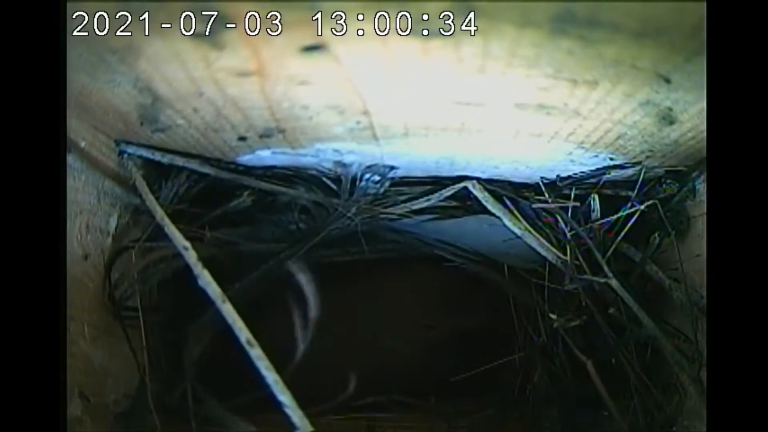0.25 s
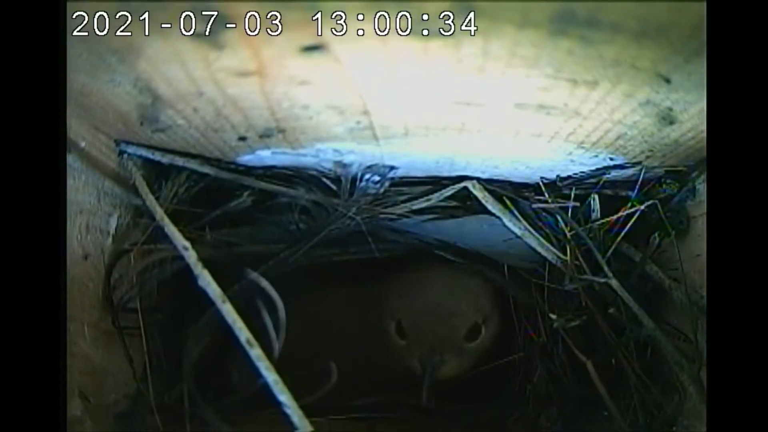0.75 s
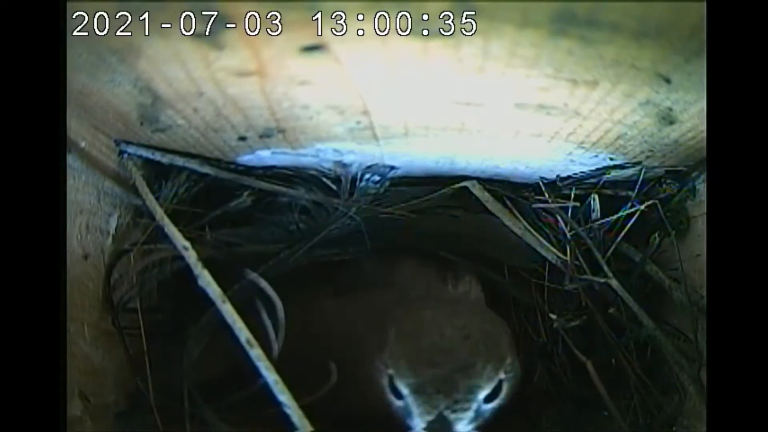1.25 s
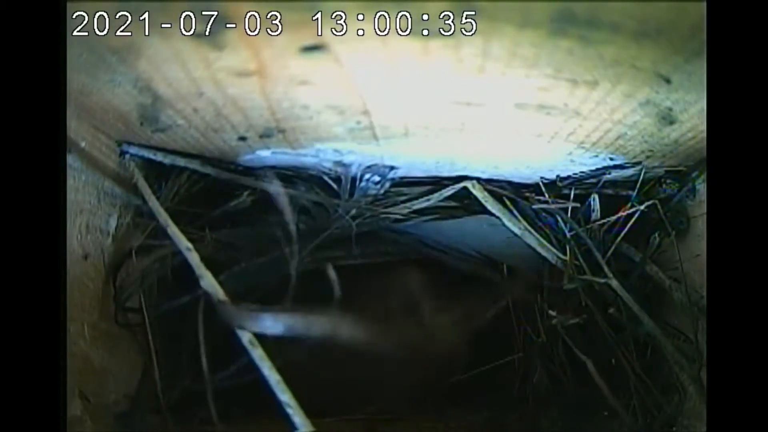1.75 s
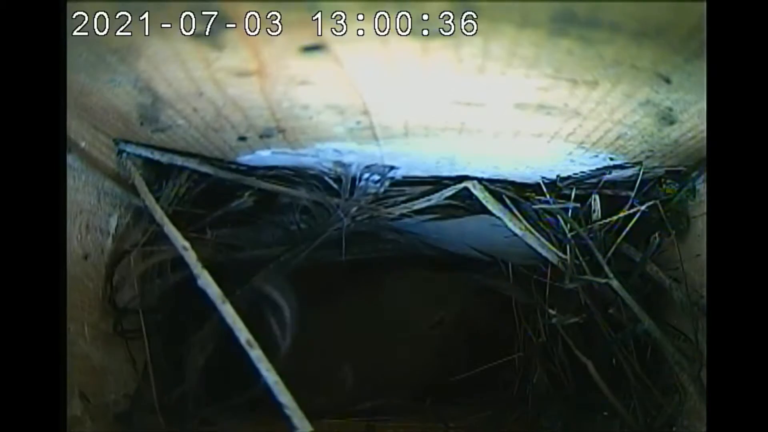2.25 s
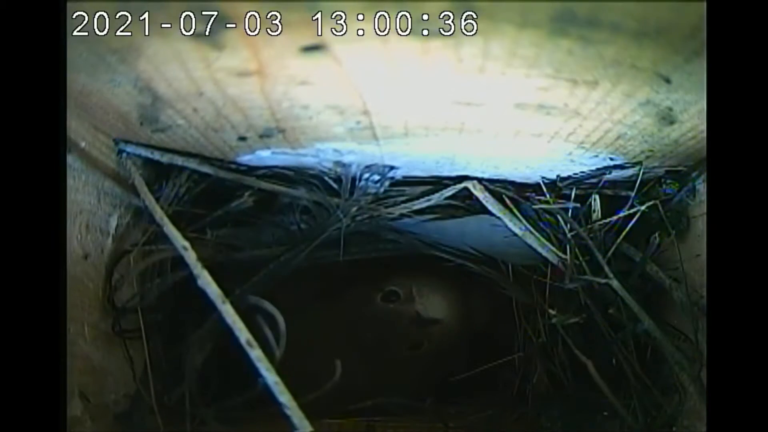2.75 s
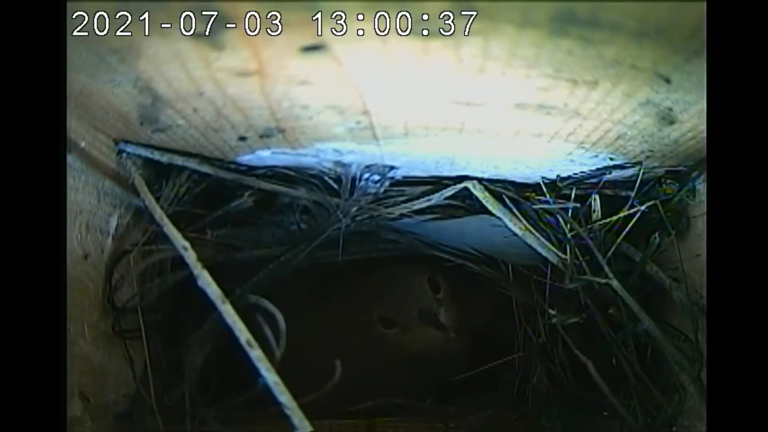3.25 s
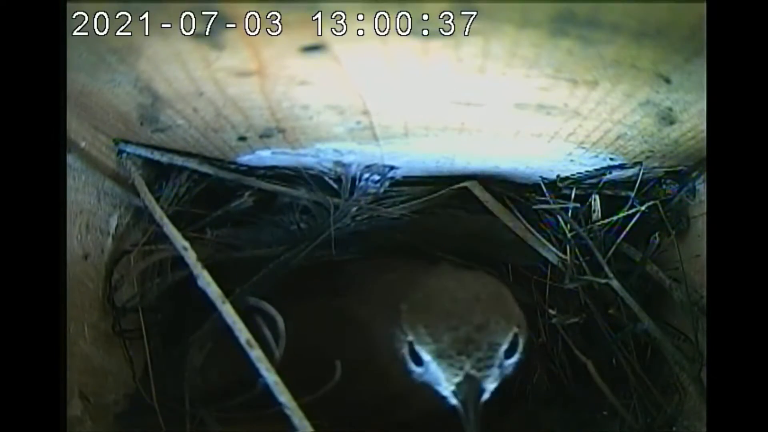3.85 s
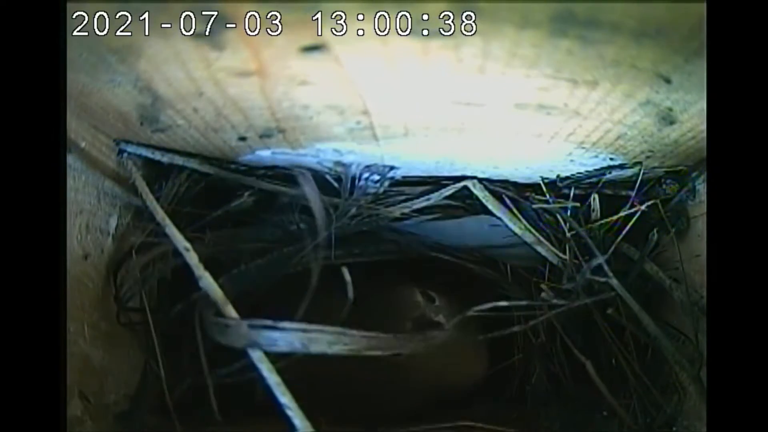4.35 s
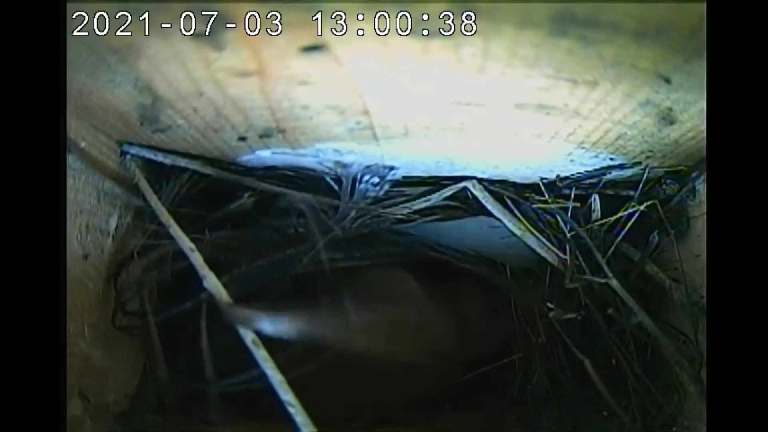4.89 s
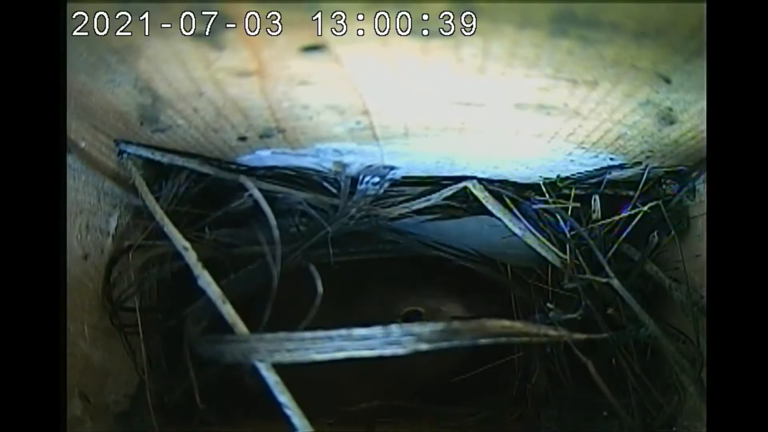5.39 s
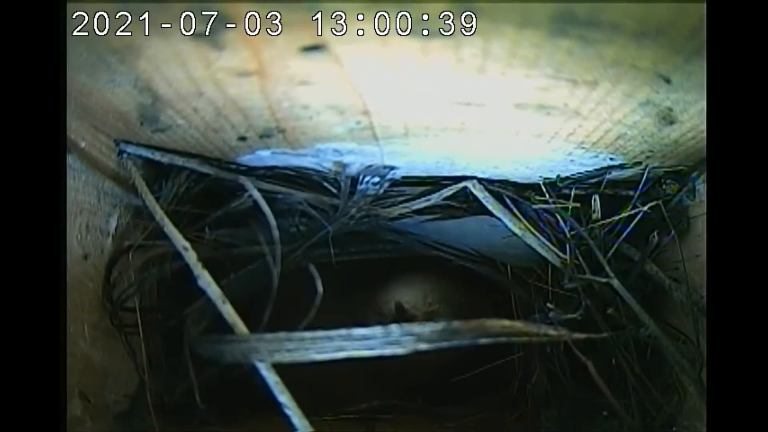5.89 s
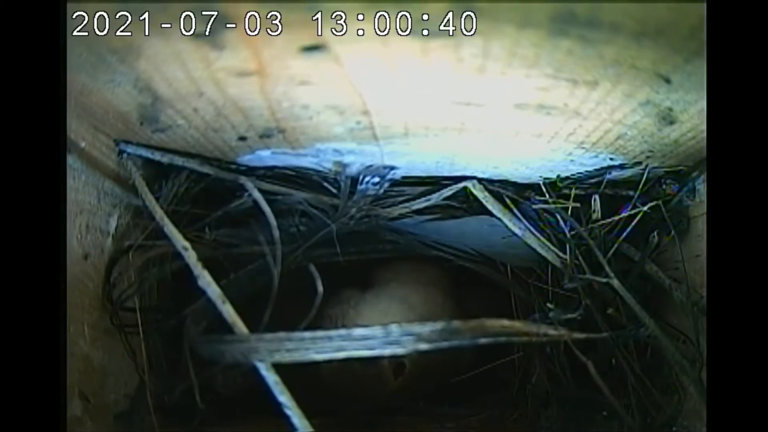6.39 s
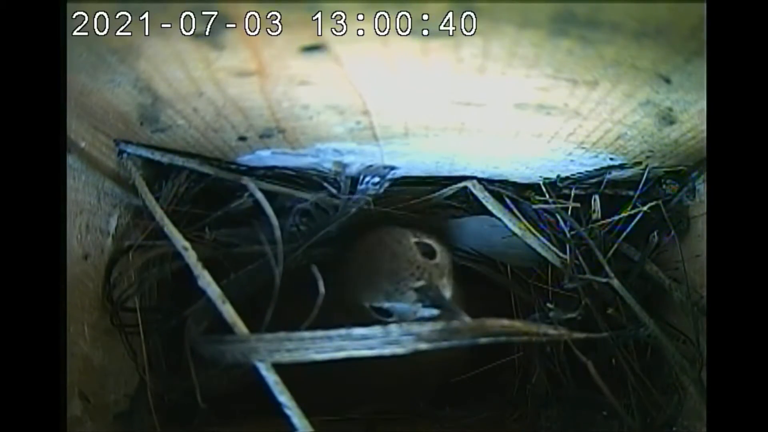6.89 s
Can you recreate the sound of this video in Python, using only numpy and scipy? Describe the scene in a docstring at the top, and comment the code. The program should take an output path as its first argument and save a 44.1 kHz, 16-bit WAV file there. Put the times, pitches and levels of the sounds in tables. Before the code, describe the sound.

A cheap small microphone in a nest box, heard mostly in the left channel, picks up low electrical hum, rumble, hiss and a thin video whine. Dry stalks rustle and wood is lightly scraped and knocked. Midway a wren sings: rough broken notes, swinging clear whistles, a rapid descending-note trill and a final flourish, ringing briefly in the box with a faint garden echo. Then it is nearly quiet.

```python
"""A wren sings at a wooden nest box, heard by a small camera inside: scratchy opening notes, then whistled trills.
Each syllable is a gliding tone with overtones and half-pitch tones, ringing in the box and echoing in the garden.
A second wren shuffles in the dry nest: shaped noise for straw and wood scrapes. Short dry clicks of bright noise
with a low knock are scattered about, some of them on top of the song. Under it lie mains hum from one repeated
cycle, a thin video whistle with fizz, low rumble and hiss; the right channel is a weak leak with its own hiss."""
import sys
import numpy as np
from scipy import signal
from scipy.fft import rfft, irfft, next_fast_len
from scipy.io import wavfile
from scipy.ndimage import map_coordinates

SR = 44100
rng = np.random.default_rng(int(sys.argv[2]) if len(sys.argv) > 2 else 0)


def transcribe(signal):
    """Save signal, clipped to [-1, 1], as a 16-bit WAV file at the path in sys.argv[1]."""
    frames = np.atleast_2d(signal).T
    limited = np.clip(frames, -1, 1)
    pcm = np.round(limited * 32767).astype(np.int16)
    wavfile.write(sys.argv[1], SR, pcm)


N = 314433
TIME = np.arange(N) / SR
MAINS_HZ = 59.89  # also the picture field rate


def amp(db):
    """Decibels to gain."""
    return 10 ** (np.asarray(db) / 20)


def unit(x):
    """Scale x to rms 1."""
    return x / np.sqrt(np.mean(x ** 2) + 1e-20)


def along(points, hz):
    """Read an outline of (f/Hz, level/dB) points on a log frequency axis."""
    f, v = np.transpose(points)
    return np.interp(np.log(hz + 1), np.log(f + 1), v)


def wobble(rate, size):
    """A smooth random curve with rate knots a second."""
    knots = rng.standard_normal(size // 4 + 8)
    return map_coordinates(knots, [np.arange(size) * rate / SR], mode="wrap")


def filtered(x, response):
    """Multiply the spectrum of x by a response of frequency."""
    m = next_fast_len(N + 8192)
    return irfft(rfft(x, m) * response(np.fft.rfftfreq(m, 1 / SR)), m)[..., :N]


def coloured(x, points, size=2048):
    """Pass x through a causal minimum-phase filter with the given outline."""
    log_gain = np.log(amp(along(points, np.fft.rfftfreq(size, 1 / SR))))
    cepstrum = irfft(log_gain)
    # folding the cepstrum forward in time makes the filter causal
    cepstrum[1:size // 2] *= 2
    cepstrum[size // 2 + 1:] = 0
    impulse = irfft(np.exp(rfft(cepstrum)))
    return signal.oaconvolve(x, impulse)[:N]


def modes(table, hz):
    """Summed response of resonances given by centre, width and level."""
    return sum(amp(db) * 1j * hz * w / (c * c - hz * hz + 1j * hz * w) for c, w, db in table)


def add(track, s, sound):
    """Mix a sound into the track at s seconds, cut at the track's end."""
    part = track[round(s * SR):][:len(sound)]
    part += sound[:len(part)]


# low modes of the wooden box: f/Hz, width/Hz, level/dB
WOOD_MODES = [(244, 44, -2.5), (323, 79, 0.5), (422, 54, -1.5), (530.5, 36.7, 3), (655, 175, -14)]


def wood(hz):
    """Response of the box's low modes; neighbours move in opposite senses."""
    return sum((-1) ** k * modes([mode], hz) for k, mode in enumerate(WOOD_MODES))


# shuffles in the nest: t/s, length/s, wood scrape level/dB, straw level/dB (both relative)
SHUFFLE_MOVES = [ (0, .16, -48, -59), (0.196, 0.066, -44.5, -57.5), (0.68, 0.018, -59, -69),
                 (1.548, 0.051, -48.5, -55), (1.62, 0.061, -47.5, -63.5), (1.726, 0.084, -45.5, -57.5),
                 (1.848, .15, -49, -57.5), (2.019, .13, -48, -59), (2.17, 0.045, -63, -63.5),
                 (2.261, .04, -45, -56), (2.357, .035, -47, -52), (2.486, 0.029, -46, -63.5),
                 (4.23, .02, -44.5, -58.5), (4.307, 0.051, -43.5, -57), (4.373, .025, -53.5, -60.5),
                 (4.48, .11, -46, -60.5), (4.62, 0.058, -58, -64), (4.712, .085, -45.5, -57),
                 (4.828, 0.038, -48, -55.5), (4.923, .115, -46.5, -57), (5.05, 0.16, -53.5, -60.5),
                 (5.241, .04, -47, -54), (5.388, 0.037, -60, -73), (5.663, .02, -49.5, -71),
                 (6.785, 0.023, -53.5, -74), ]
# tone colour of slipping straw: f/Hz, relative level/dB
STRAW_COLOUR = [(530, -58), (900, -26.5), (1420, -5.5), (1680, -10.5), (1920, 0.5), (2780, -15),
                (3040, -13), (3930, -15.5), (4550, -7), (5030, -23.5), (5560, -22.5), (6430, -21),
                (7520, -30), (10100, -26), (13000, -30)]
SHUFFLE_ATTACK_S, SHUFFLE_T60_S = 0.011, 0.14  # a shuffle starts quickly, then the stalks settle


def shuffling(straw_db=7, scrape_db=-2, grain_rate=2200, uneven_db=1.2, surge_db=1.5):
    """Dry stalks slip in clumps of tiny ticks, while the bird's body rubs the wooden walls."""
    scrape, straw = np.zeros((2, N))
    t = np.arange(SR // 2) / SR
    for s, length, wood_db, stalk_db in SHUFFLE_MOVES:
        settling = amp(-60 * np.maximum(t - length, 0) / SHUFFLE_T60_S)
        push = np.minimum(t / SHUFFLE_ATTACK_S, 1) * settling
        add(scrape, s, amp(wood_db) * push)
        add(straw, s, amp(stalk_db) * push)
    clumps = amp(2.74 * wobble(130, N) + surge_db * wobble(35, N))
    # sparse random ticks, on average grain_rate a second
    slips = (rng.random(N) < grain_rate / SR) * rng.standard_normal(N) * clumps
    rough_noise = rng.standard_normal(N) * amp(uneven_db * wobble(60, N))
    rubbing = unit(filtered(rough_noise, wood))
    rustle = unit(coloured(slips, STRAW_COLOUR))
    return amp(straw_db) * straw * rustle + amp(scrape_db) * scrape * rubbing


# outline of the mains harmonics: f/Hz, relative level/dB
HUM_OUTLINE = [(60, -56.5), (120, -56.5), (180, -62.5), (240, -73.5), (300, -63.5), (420, -79),
               (720, -85.5), (1260, -85.5), (2400, -90), (4000, -104), (12500, -106), (15000, -100)]


def mains(scatter_db=3, size=8192, count=251):
    """One cycle of electrical buzz repeats at the mains rate; its harmonics above 400 Hz are uneven."""
    hz = MAINS_HZ * np.arange(1, count + 1)
    unevenness_db = scatter_db * (hz > 400) * rng.standard_normal(count)
    levels = amp(along(HUM_OUTLINE, hz) + unevenness_db)
    harmonics = levels * np.exp(2j * np.pi * rng.random(count))
    cycle = irfft(np.append(0, harmonics), size) * size / np.sqrt(2)
    return np.interp(TIME * MAINS_HZ % 1 * size, np.arange(size), cycle)


# bursts of fizz in each picture field: position/share of the field, relative level/dB
FIELD_BURSTS = [(.52, 0.5), (.82, 0)]
# tone colour of the fizz: f/Hz, relative level/dB
FIZZ_COLOUR = [(9500, -30), (11200, -10), (12500, -13), (13900, -1.5), (14800, -5.5), (15700, 0),
               (16200, -41)]
WHISTLE_HZ = 15718


def video_whistle(whistle_db=-58, half_rate_db=-87, fizz_db=-74.0, spike_db=-62, spike_width=.03, field_peak=.7):
    """The line scan leaks in as a thin whistle and fizz, chopped by every picture field."""
    cycle = MAINS_HZ * TIME % 1
    field = np.clip(1 / 2 + .9 * np.cos(2 * np.pi * (cycle - field_peak)), .2, 1)
    phase = 2 * np.pi * WHISTLE_HZ * TIME + .12 * wobble(300, N)
    flicker = amp(.6 * wobble(70, N))
    whistle = amp(whistle_db) * flicker * np.sqrt(2) * np.sin(phase)
    half_rate = amp(half_rate_db) * np.sqrt(2) * np.sin(phase / 2)
    spikes = sum(amp(spike_db + db) * np.exp(-((cycle - at) / spike_width) ** 2) for at, db in FIELD_BURSTS)
    fizz = unit(coloured(rng.standard_normal(N), FIZZ_COLOUR))
    return field * (whistle + amp(fizz_db) * fizz) + spikes * fizz + half_rate


# outline of the steady noise: f/Hz, relative level/dB in each Hz
NOISE_FLOOR = [(15, -86), (40, -83), (150, -77), (290, -78.5), (400, -88.5), (560, -86), (700, -94),
               (1050, -102.3), (1650, -101.2), (2150, -97.5), (3600, -108), (4550, -104), (5200, -111),
               (8000, -110.5), (9700, -113), (12000, -112.5), (16000, -112)]


def background(drift_db=1.57):
    """Low outdoor rumble in the box, drifting in level, and the microphone's hiss."""
    noise = filtered(rng.standard_normal(N), lambda hz: amp(along(NOISE_FLOOR, hz))) * np.sqrt(SR / 2)
    rumble = filtered(noise, lambda hz: 1 / (1 + (hz / 3000) ** 2))
    drift = amp(drift_db * wobble(12, N))
    return noise + rumble * (drift - 1)


# short dry clicks, some of them on top of the song:
# t/s, bright noise level/dB, middle noise level/dB, low knock level/dB (all relative)
CLICK_HITS = [(0.2095, -52, -52, -36), (0.261, -44.5, -49.5, -47), (1.5407, -54, -50, -34.5),
              (1.782, -47.5, -45.5, -49), (1.9684, -54.5, -45, -29), (2.2913, -57, -55, -41),
              (2.365, -39.5, -27.5, -27), (2.3774, -39, -48, -46), (3.678, -46.5, -45, -50),
              (3.8016, -39, -37, -48), (4.2363, -43, -39, -41), (4.4854, -42.5, -39, -32),
              (4.4937, -41, -38, -58), (4.724, -37.5, -37, -39)]
# tone colour of the bright noise: f/Hz, relative level/dB
BRIGHT_COLOUR = [(2000, -20), (6000, -8), (11000, 6), (15000, -3)]
# tone colour of the middle noise: f/Hz, relative level/dB
MIDDLE_COLOUR = [(900, -38), (1400, -13.5), (2400, -24.5), (3100, 7), (4500, 4.5), (5300, -7.5),
                 (7200, -9.5), (15000, -54)]


def clicks(bright_gain_db=-3, middle_gain_db=7, knock_gain_db=11, tail_db=-18, knock_t60=0.065):
    """Each click is a burst of bright noise with a faint tail and a low knock."""
    bright, middle, knocks = np.zeros((3, N))
    t = np.arange(SR // 8) / SR
    fade = amp(-60 * t / .011) + amp(tail_db - 60 * t / .08)  # sharp burst, then the faint tail
    for s, bright_db, middle_db, knock_db in CLICK_HITS:
        add(bright, s, amp(bright_db + bright_gain_db) * fade * rng.standard_normal(len(t)))
        add(middle, s, amp(middle_db + middle_gain_db) * fade * rng.standard_normal(len(t)))
        knock = amp(knock_db + knock_gain_db - 60 * t / knock_t60)
        add(knocks, s, knock * rng.standard_normal(len(t)))
    return coloured(bright, BRIGHT_COLOUR) + coloured(middle, MIDDLE_COLOUR) + filtered(knocks, wood)


# single opening notes: t/s, syllable, length/s, relative level/dB
OPENING_NOTES = [ (2.456, "churr", 0.064, -51), (2.557, "churr", 0.12, -49), (2.655, "tsip", .02, -50),
                 (2.713, "chit", 0.035, -44), (3.017, "chak", .037, -39.3), (3.085, "peep", .033, -42.5),
                 (3.137, "rasp", 0.057, -42), (3.207, "tup", .023, -35), (3.41, "chak", .034, -39.5),
                 (3.435, "lift", .028, -35), (3.485, "squeak", .029, -30), (3.531, "slur", 0.041, -36), ]
# motifs, one row a syllable: syllable, delay/s, length/s, relative level/dB at first, swell/dB over the run
SONG_MOTIFS = { "chatter": [("scratch", 0, .023, -52, 2.5), ("arch", .017, .046, -45.5, 4),
               ("tsip", 0.043, .02, -47.5, 1.5)], "hooks": [("hook", 0, .0465, -41.5, .5)],
               "scoops": [("dive", 0, .02, -35.5, .5), ("scoop", .018, .034, -39.5, .5)],
               "seesaw": [("warble", .0005, .0405, -32.5, 1.8), ("zip", .0545, .038, -35, -1.7),
               ("tew", 0.0734, .028, -24.5, 4.4)], "trill": [("trill", 0, .0355, -25, -1.8)],
               "flourish": [("roll", 0, .036, -35, 0), ("chew", 0.042, .028, -28, 0),
               ("wheet", 0.073, .042, -30, -.5)], }
# runs of one motif: t/s, motif, repeats, period/s, slowing/s per repeat
MOTIF_RUNS = [ (2.7795, "chatter", 3, .078, 0), (3.243, "hooks", 3, .0555, 0),
              (3.5938, "scoops", 2, .072, 0), (3.7375, "seesaw", 5, .1138, .0014),
              (4.3233, "trill", 12, .0477, .00024), (4.9335, "flourish", 2, .155, 0), ]
PITCH_SAG = .025  # share by which the pitch sinks from the first repeat of a run to the last


def score():
    """List notes as (t/s, syllable, length/s, level/dB, pitch factor); runs sink in pitch and some slow."""
    notes = [(*note, 1) for note in OPENING_NOTES]
    for start, motif, count, period, slowing in MOTIF_RUNS:
        for k in range(count):
            s = start + k * period + slowing * k * k / 2
            progress = k / (count - 1)
            settled = 1 - (1 - progress) ** 2  # level moves fast at first, then eases
            tuning = 1 + PITCH_SAG * (1 / 2 - progress)
            for name, delay, length, db, swell_db in SONG_MOTIFS[motif]:
                notes.append((s + delay, name, length, db + swell_db * settled, tuning))
    return notes


# tones of voice: overtones level/dB, half-pitch tones level/dB, pitch roughness/share, pulsing depth/0-1
VOICE_TONES = { "clear": (-43.5, -51.5, 0.0374, 0), "husky": (-35, -21.5, 0.07, 0.18),
               "reedy": (-10.5, -22, 0.14, 0.05), "brassy": (2, -20, 0.23, 0.36),
               "split": (-13.5, -3.5, 0.2, 0.16), "harsh": (-24, -13, 0.22, 0.4),
               "buzzy": (-15.5, -3, 0.12, 0.33), }
# syllables: voice, attack/share of length, release/share of length, evenly spaced glide points f/Hz
SYLLABLE_SHAPES = { "churr": ("buzzy", .22, 0.092, [1860, 1970, 2100]),
                   "chit": ("split", .3, 0.24, [1660, 2300, 1995, 1400]),
                   "scratch": ("harsh", 0.44, 0.092, [2300, 2700, 3250]),
                   "arch": ("reedy", .45, .15, [1650, 2050, 2143, 1876, 1640]),
                   "tsip": ("harsh", 0.52, .2, [7050, 5750, 4930]),
                   "chak": ("harsh", .25, 0.45, [2900, 2650, 2140, 2050]),
                   "peep": ("reedy", .35, 0.64, [2180, 5030, 4600, 4220, 4080]),
                   "rasp": ("harsh", .3, .2, [2290, 2540, 2850, 2050]),
                   "tup": ("husky", 0.63, 0.26, [2150, 2250, 1930]),
                   "hook": ("brassy", .66, 0.23, [2040, 3155, 3600, 3170, 2207, 1846, 1450]),
                   "lift": ("husky", .5, .15, [1880, 2440, 2850, 2550]),
                   "squeak": ("clear", .55, 0.18, [2980, 4950, 6850, 6560, 6300, 5850]),
                   "slur": ("split", 0.63, 0.28, [1900, 2285, 2350, 1940, 1600]),
                   "dive": ("husky", .75, 0.14, [7000, 6500, 4880, 4200]),
                   "scoop": ("clear", .35, .1, [4200, 4700, 5180, 5220]),
                   "warble": ("clear", 0.36, .12, [2054, 2395, 1986, 2518, 2110, 2677, 2700, 2396, 2060, 1657]),
                   "zip": ("husky", 0.31, 0.73, [2702, 4350, 4596, 4250, 4110, 4000]),
                   "tew": ("clear", 0.48, 0.44, [3790, 3440, 3246, 3170, 3140]),
                   "trill": ("clear", 0.46, 0.55, [3040, 3450, 2950, 3402, 2850, 2387, 2234, 2097, 1950]),
                   "roll": ("clear", .25, 0.13, [1900, 2300, 1955, 2455, 2694, 2360, 1800]),
                   "chew": ("clear", 0.42, 0.58, [2630, 3170, 2630, 2210, 2100]),
                   "wheet": ("clear", 0.27, .75, [2850, 3280, 3440, 3670, 3720]), }


def syllable(name, length, tuning, third_db=-9, shimmer_db=1.8, pulse_hz=118, curve=1.11, undertone_db=-3.5):
    """The syrinx glides through one gesture; in harsh notes it shakes, pulses and doubles its period."""
    voice, attack, release, path = SYLLABLE_SHAPES[name]
    overtone_db, half_db, rough, pulsing = VOICE_TONES[voice]
    t = np.arange(int(length * SR)) / SR
    u = t / length
    glide = map_coordinates(np.array(path, float), [u * (len(path) - 1)], mode="nearest")
    shaken_pitch = tuning * glide * (1 + rough * wobble(1500, len(t)))
    phase = 2 * np.pi * np.cumsum(shaken_pitch) / SR
    overtones = np.sin(2 * phase) + amp(third_db) * np.sin(3 * phase)
    halves = amp(undertone_db) * np.sin(phase / 2) + np.sin(phase + phase / 2)
    tone = np.sin(phase) + amp(overtone_db) * overtones + amp(half_db) * halves
    envelope = np.clip(np.minimum(u / attack, (1 - u) / release), 0, 1) ** curve
    shimmer = amp(shimmer_db * wobble(450, len(t)))
    pulses = 1 + pulsing * np.sin(2 * np.pi * pulse_hz * t)
    return np.sqrt(2) * tone * envelope * shimmer * pulses


def echo(x, t60, size=8192):
    """A diffuse decaying tail of x, drawn afresh at every call."""
    tail = rng.standard_normal(size) * amp(-60 * np.arange(size) / SR / t60)
    return signal.fftconvolve(x, tail / np.linalg.norm(tail))


# what the box passes of the song: f/Hz, relative level/dB
BOX_COLOUR = [(950, -28.5), (1400, 4), (2000, -2), (2600, -2.5), (3150, 1.5), (3750, -7), (4500, 5),
              (5400, -10.5), (6450, 5), (7200, -11), (8200, -11), (9500, -30), (15000, -63)]
# air modes of the box that ring on after a note: f/Hz, width/Hz, level/dB
AIR_MODES = [(1946, 81, -7), (4370, 31, -2), (4600, 29, -3.5), (6184, 45, -4), (6400, 59, -6)]


def song(box_db=-14, box_t60=0.056, garden_db=-23.0, garden_t60=0.61, slap_db=-29, slap_s=.087):
    """Each syllable rings briefly in the box; the garden answers with one faint slap and a diffuse tail."""
    track = np.zeros(N)
    for s, name, length, db, tuning in score():
        note = amp(db) * syllable(name, length, tuning)
        add(track, s, note)
        add(track, s + slap_s, note * amp(slap_db))
        add(track, s, echo(note, t60=box_t60) * amp(box_db))
        add(track, s, echo(note, t60=garden_t60, size=16384) * amp(garden_db))
    return filtered(coloured(track, BOX_COLOUR), lambda hz: 1 + modes(AIR_MODES, hz))


def scene(right_db=-22.5, right_hiss_db=-85):
    """One microphone feeds the left channel and leaks weakly into the right, which has its own hiss."""
    microphone = shuffling() + mains() + video_whistle() + background() + clicks() + song()
    left = 2 * microphone / (1 + amp(right_db))  # the mean of both channels keeps the microphone level
    right = amp(right_db) * left + amp(right_hiss_db) * rng.standard_normal(N)
    return np.array([left, right])


TOP_HZ = 15765


def record(dry):
    """The camera keeps nothing above its band limit."""
    return filtered(dry, lambda hz: hz < TOP_HZ)


dry = scene()
out = record(dry)
transcribe(out)
```